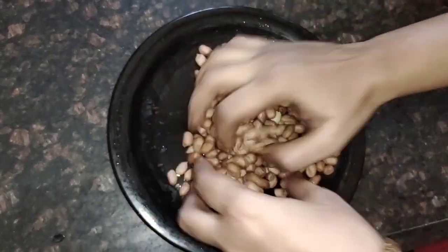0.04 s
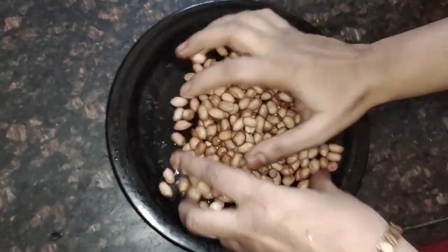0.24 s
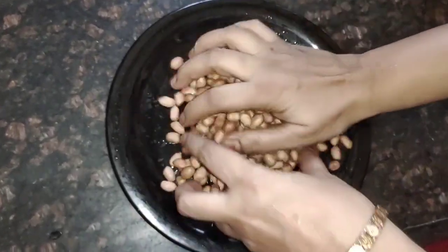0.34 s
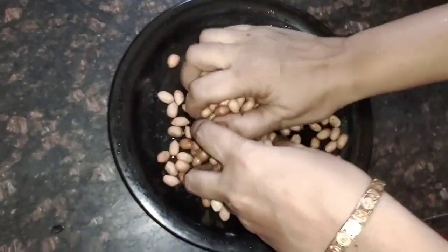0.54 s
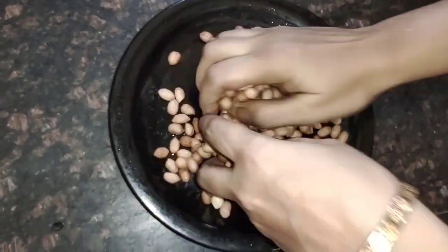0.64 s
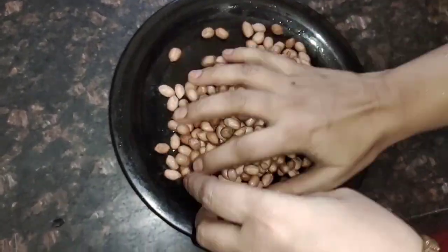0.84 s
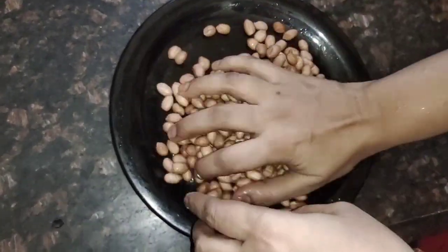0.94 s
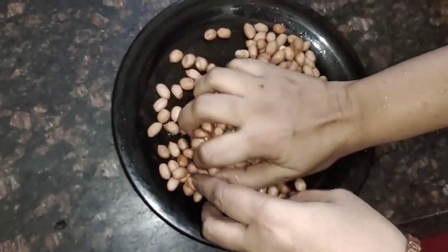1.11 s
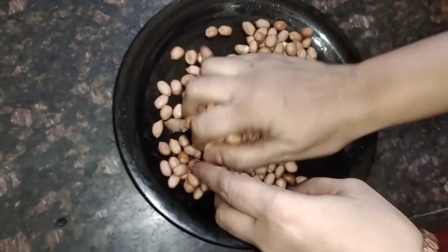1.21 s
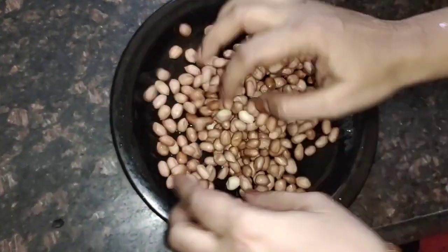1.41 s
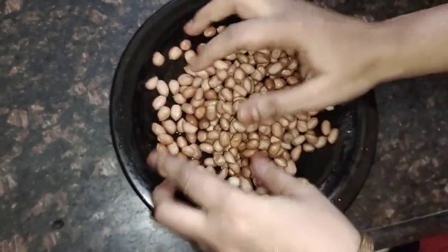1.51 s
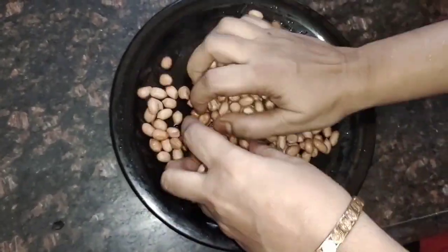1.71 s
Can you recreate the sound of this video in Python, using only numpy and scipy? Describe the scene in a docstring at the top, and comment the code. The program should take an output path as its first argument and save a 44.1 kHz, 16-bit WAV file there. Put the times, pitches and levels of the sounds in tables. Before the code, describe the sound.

Close up in a small hard kitchen, hands stir moist peanuts in a dish, starting softly, then clicking sharply in uneven bursts, with two gritty scrapes, fine hiss and slight dish ringing over very faint hum.

```python
"""Two hands turn damp raw peanuts in a shallow dish on a kitchen counter, over still air and a faint mains hum.
A few soft knocks come first; from 0.2 s a handful lands in sharp clicks, each a noise contact with short rings.
A strong scrape of stick-slip grains at 0.87 s leads into the loudest, densest knocks, up to about 1.1 s.
A tiny rising squeak, a swept sine, follows at 1.23 s; then come more knocks, with another scrape near 1.5 s.
Touches and a high hiss of ticks fill in, soft thuds sit below, the dish rings in its modes, a small room answers."""
import sys
import numpy as np
from scipy import signal
from scipy.fft import rfft, irfft
from scipy.io import wavfile
from scipy.ndimage import uniform_filter1d

SR = 44100
rng = np.random.default_rng(int(sys.argv[2]) if len(sys.argv) > 2 else 0)


def unload_audio(sound):
    """Save the sound as a 16-bit wav file, at the path given as the first command line argument."""
    columns = np.transpose(np.atleast_2d(sound))
    # keep every value between -1 and 1, then stretch to whole-number steps
    steps = np.round(np.clip(columns, -1, 1) * 32767)
    wavfile.write(sys.argv[1], SR, steps.astype(np.int16))


N = 77175

# Room air colour: f/Hz, relative level/dB
AIR_COLOUR = [(20, 0.5), (70, -4), (150, -3.5), (300, -3), (600, -4.5), (1500, -15.5), (3000, -30),
              (6000, -23), (10000, -30.5), (15500, -35)]
AIR_DB = -61
# Mains hum lines: f/Hz, rms level/dB
HUM_LINES = [(48.6, -64), (98, -70.5)]

# Small hard room: echo gain, decay below and in the treble, build-up time
ROOM_DB, ROOM_T60_S, ROOM_TREBLE_T60_S, ROOM_BUILD_UP_S = -8, 0.23, 0.38, 0.0017

# Modes of the dish: f/Hz, relative level/dB, t60/s
DISH_MODES = [(1020, -13, .12), (1735, -13, .14), (2010, -14, .14), (2415, -14, .14), (2630, -14, .12),
              (2732, -3, .26), (3672, -13, .14), (4361, -9, .1), (5110, -14, .05), (6226, -14, .06)]
DISH_DB = 2

# Fingers and nuts bumping the bottom of the dish: t/s, level/dB, f/Hz
BUMPS = [(.302, -39, 608), (0.321, -49, 370), (.795, -42.5, 724), (1.031, -45, 560), (1.07, -52, 254)]
BUMP_SWELL_S = 0.0036  # time to the peak, and time constant of the fade

# A damp nut squeaks on the bottom; the jitter is the rms share of the pitch
SQUEAK_AT_S, SQUEAK_S, SQUEAK_DB = 1.228, .045, -39
SQUEAK_START_HZ, SQUEAK_END_HZ, SQUEAK_JITTER = 560, 669, 0.094

# How hard the hands push nuts over the bottom: t/s, relative level/dB
PUSH = [(0, -64), (.06, -56), (.2, -71), (.224, -46), (.286, -53), (.316, -36), (.34, -50.5), (.62, -58.5),
        (.676, -54), (.73, -59), (.848, -42.5), (.872, -31.5), (.935, -39.5), (.99, -52.5), (1.222, -56),
        (1.242, -51.5), (1.36, -53.5), (1.472, -52), (1.496, -33), (1.534, -33.5), (1.546, -43),
        (1.6, -46.5), (1.66, -62.5), (1.75, -64)]
# Scraping colour: f/Hz, relative level/dB
SCRAPE_COLOUR = [(150, -57.5), (400, -22.5), (540, -2.5), (750, -1.5), (1030, 7), (1280, 0), (1450, 1),
                 (1750, 3), (2700, 0.5), (3300, -27), (4600, -35), (6300, -28), (8000, -43), (15000, -62)]
SCRAPE_DB, SLIPS_PER_S, SLIP_SPREAD_DB = 3, 2100, 9.5

# Colour of the high hiss: f/Hz, relative level/dB
HISS_COLOUR = [(1500, -39), (4000, 1), (6000, 3), (7200, 0.5), (9200, -7.5), (11000, -14.5), (15500, -40)]
HISS_DB, HISS_TICKS_PER_S, HISS_SPREAD_DB = -16, 1500, 9.5

# Small nuts jostling in the heap: t/s, relative level/dB
JOSTLE = [(0, -61.5), (.11, -65), (.21, -63), (.235, -42), (.29, -54), (.33, -41.5), (.48, -38.5),
          (.54, -58), (.62, -60), (.66, -38.5), (.82, -50.5), (.92, -36.5), (.96, -31.5), (1.06, -40.5),
          (1.16, -38.5), (1.22, -51), (1.28, -36.5), (1.36, -50.5), (1.45, -42.5), (1.58, -46), (1.66, -61),
          (1.75, -41)]
JOSTLE_DB = 0.5
# Sizes of nut in the heap: pitch f/Hz, relative level/dB
NUT_SIZES = [(1550, -6.5), (2050, 9), (2600, 5), (3200, 4), (3900, -11), (5600, 3.5)]
TOUCHES_PER_S, TOUCH_SPREAD_DB, TOUCH_WIDTH_HZ = 700, 4, 650

# Nuts landing and knocking: t/s, relative level/dB, knock pitch f/Hz,
# snap of the shell relative to the knock/dB (before SNAP_DB), decay time constant/s
KNOCKS = [(0.0385, -47, 2510, -8.5, 0.0038), (0.061, -42.5, 2310, -17, 0.0018),
          (0.0962, -45, 2730, -30, 0.003), (0.1136, -44, 2540, -32, 0.0027),
          (0.1388, -40.5, 3170, 4, 0.0054), (0.2186, -22.5, 2850, -9.5, 0.005),
          (0.227, -24, 2860, -11, 0.0028), (0.2578, -32, 2730, -9, 0.0034), (0.303, -35, 2260, -22, 0.0017),
          (0.3114, -21, 2750, 2.5, 0.001), (0.3154, -19, 2670, -12, 0.0033),
          (0.332, -25.5, 2880, 1, 0.0027), (0.343, -25.5, 2510, -3.5, 0.0022),
          (0.3702, -30, 3320, -9, 0.0025), (0.3838, -26, 3070, -4, 0.0012),
          (0.3983, -14.5, 4390, -2, 0.0022), (0.4064, -21.5, 2970, -25, 0.003),
          (0.4562, -24, 2590, -4.5, 0.0078), (0.4677, -30, 2760, -23, 0.0022),
          (0.4799, -27, 3030, 0, 0.0043), (0.4841, -26.5, 2690, -24, 0.0023),
          (0.504, -28, 2720, -22, 0.0024), (0.5688, -38.5, 2040, -24, 0.0057),
          (0.5765, -32.5, 1770, -19, 0.0027), (0.637, -31.5, 3050, -2.5, 0.0044),
          (0.6407, -32.5, 3100, 2, 0.0023), (0.6507, -25.5, 1647, -13, 0.0019),
          (0.6778, -27.5, 1897, -18, 0.0046), (0.6875, -26.5, 2770, -9.5, 0.0021),
          (0.727, -31.5, 2780, -10, 0.0022), (0.7453, -37, 2720, -21, 0.0025),
          (0.758, -29, 2550, -12.5, 0.0037), (0.7882, -27, 2150, -48, 0.0013),
          (0.7953, -28, 2470, -4, 0.0027), (0.8373, -34, 2340, -19, 0.002),
          (0.862, -22.5, 2320, -45, 0.0074), (0.872, -29, 1910, -23, 0.0041),
          (0.8841, -22.5, 2510, -9.5, 0.0044), (0.9026, -33, 2210, -24, 0.0014),
          (0.9254, -13, 2665, -14, 0.0076), (0.9375, -11, 2780, -1.5, 0.0026),
          (0.9556, -24, 2730, -15, 0.003), (0.9602, -17.5, 2730, -9, 0.0048),
          (0.9677, -22, 2710, -28, 0.003), (0.9812, -18, 2640, -9.5, 0.0016),
          (0.9876, -19, 2900, -5, 0.0015), (1.0011, -27.5, 2450, -26, 0.0042),
          (1.008, -26, 2860, -6, 0.0033), (1.0153, -21, 2750, -11.5, 0.005),
          (1.0302, -14.5, 2356, -14, 0.0014), (1.0329, -14.5, 2290, -23, 0.00083),
          (1.0552, -23, 2670, -11, 0.0008), (1.0698, -16, 2600, -18, 0.0014),
          (1.0984, -28.5, 2580, -29, 0.0014), (1.1184, -21, 2840, 1, 0.0016),
          (1.1567, -31.5, 2720, -3.5, 0.0017), (1.1836, -36.5, 2300, -6.5, 0.0049),
          (1.236, -30.5, 2390, -7, 0.0028), (1.2492, -28, 2220, -18, 0.002),
          (1.2542, -18.5, 2450, -16, 0.0018), (1.2775, -30, 2360, -11, 0.0056),
          (1.2823, -33, 2400, -31, 0.0028), (1.2924, -22.5, 2290, -30, 0.00086),
          (1.2992, -35, 2460, -4, 0.0026), (1.3299, -30.5, 2670, -23, 0.0019),
          (1.3532, -31.5, 1860, -28.5, 0.0016), (1.3728, -22, 2400, -16, 0.0013),
          (1.3774, -14, 2850, -5, 0.0028), (1.4158, -35, 2070, -23, 0.0023),
          (1.424, -38, 2510, -17, 0.0046), (1.4432, -16, 2750, -32, 0.0028),
          (1.473, -47, 2280, -25, 0.0016), (1.4777, -27, 2290, -18.5, 0.0023),
          (1.4856, -22, 2590, -36, 0.0017), (1.492, -22.5, 3000, -6, 0.005),
          (1.4965, -24.5, 2020, -13, 0.0045), (1.513, -18, 2590, -17, 0.00091),
          (1.524, -40, 1860, -10, 0.0024), (1.5308, -19.5, 2510, -13.5, 0.00063),
          (1.552, -28.5, 2810, -12, 0.0014), (1.5751, -28, 2590, -9, 0.0034),
          (1.5788, -26, 2270, -14, 0.0033), (1.5886, -25, 2670, -28, 0.0016),
          (1.5943, -29.5, 2670, -23, 0.0016), (1.6015, -35, 2380, -27, 0.003),
          (1.615, -36, 2630, -14, 0.003), (1.6329, -30, 2590, -6, 0.0028),
          (1.6724, -30.5, 2640, -13, 0.0035), (1.68, -26, 5730, -7, 0.0022),
          (1.7151, -24.5, 2690, -3, 0.00096), (1.7246, -34, 2670, -2, 0.0026)]
# Colour of a nut's contact: f/Hz, relative level/dB
NUT_COLOUR = [(100, -54), (420, -47), (600, -11.5), (1050, -16.5), (1250, -1), (1750, 1), (2350, -0.5),
              (2730, 3.5), (3050, -5), (3600, 0.5), (4350, -4.5), (4700, -14), (5100, -5.5), (5500, -10),
              (5800, -6), (6350, -9), (7000, -21.5), (9200, -28), (11000, -41), (15500, -49)]
KNOCK_DB, KNOCK_OCTAVES = -1.5, 0.46  # trim and bandwidth
CONTACT_S, CHATTER_DB, SOFT_ATTACK_S = 0.00017, -5, .0008  # the attack shortens as the snap brightens
RING_DB = -2.5  # ring at the nut's own pitch
# Side rings at chance pitches around the nut's own
SIDE_RINGS, SIDE_OCTAVES, SIDE_DECAY_S, SIDE_DB = 4, .6, .006, -7
# Snap: trim, lower edge, range of its chance ring and level of that ring
SNAP_DB, SNAP_HZ, SNAP_LOW_HZ, SNAP_HIGH_HZ, SNAP_RING_DB = -3.5, 4275, 4200, 6400, -2

TOP_HZ = 15800


def undb(db):
    """Decibels to gain."""
    return 10 ** (np.asarray(db) / 20)


def unit(x):
    """Scale to rms 1."""
    return x / np.sqrt(np.mean(x ** 2) + 1e-20)


def even(x, count=200):
    """Match layers by scaling the first samples to a standard deviation of 1."""
    return x / x[:count].std()


def curve(rows):
    """Gain over time, drawn straight in dB between (t/s, level/dB) points."""
    return undb(np.interp(np.arange(N) / SR, *np.array(rows).T))


def colour(x, points, order=4096):
    """Minimum-phase filter through (f/Hz, level/dB) points, by folding the cepstrum."""
    hz, db = np.array(points).T
    f = np.maximum(np.fft.rfftfreq(order, 1 / SR), 1)
    gain = undb(np.interp(np.log(f), np.log(hz), db))
    cepstrum = irfft(np.log(gain))
    cepstrum[1:order // 2] *= 2
    cepstrum[order // 2 + 1:] = 0
    impulse = irfft(np.exp(rfft(cepstrum)))
    return signal.fftconvolve(x, impulse)[:len(x)]


def band(x, hz, kind, order=2):
    """Butterworth filter."""
    edges = np.clip(hz, 20, SR / 2 - 500)
    return signal.sosfilt(signal.butter(order, edges, kind, fs=SR, output="sos"), x)


def resonance(x, hz, width_hz):
    """One short ring per impact, from a gentle bandpass."""
    return band(x, [hz - width_hz / 2, hz + width_hz / 2], "bandpass", order=1)


def grains(rate, spread_db):
    """Random tiny impacts of uneven size and sign, with an even mean level."""
    hit = rng.random(N) < rate / SR
    size = np.clip(rng.standard_normal(N), -2, 2)
    x = hit * np.sign(rng.standard_normal(N)) * undb(spread_db * size)
    power = np.abs(uniform_filter1d(x ** 2, size=1500))
    return x / np.sqrt(power + 1e-5)


def background():
    """Still room air is coloured noise; the hum is steady sines at chance phases."""
    t = np.arange(N) / SR
    hum = 0
    for hz, db in HUM_LINES:
        hum = hum + undb(db) * np.sqrt(2) * np.sin(2 * np.pi * (hz * t + rng.random()))
    air = undb(AIR_DB) * unit(colour(rng.standard_normal(N), AIR_COLOUR))
    return hum + air


def kitchen(x, size=22000):
    """A small hard room echoes as a diffuse noise tail, with its own decay in the treble."""
    t, noise = np.arange(size) / SR, rng.standard_normal(size)
    low = band(noise, 4500, "lowpass", order=1)
    low_fade = np.exp(-np.log(1000) * t / ROOM_T60_S)
    treble_fade = np.exp(-np.log(1000) * t / ROOM_TREBLE_T60_S)
    build_up = 1 - np.exp(-(t / ROOM_BUILD_UP_S) ** 2)
    tail = (low * low_fade + (noise - low) * treble_fade) * build_up
    return undb(ROOM_DB) * signal.fftconvolve(x, tail / np.linalg.norm(tail))[:N]


def dish(x, size=16000):
    """The dish rings in decaying modes, damped by the nuts and hands."""
    t = np.arange(size) / SR
    ring = 0
    for hz, db, t60 in DISH_MODES:
        decay = np.log(1000) / t60
        gain = undb(db + DISH_DB) * 2 * decay / SR  # a slow decay gets no extra gain at the mode
        ring = ring + gain * np.exp(-decay * t) * np.cos(2 * np.pi * hz * t)
    return signal.fftconvolve(x, ring)[:N]


def bumps():
    """Soft low thuds are sines that swell and die in a few cycles."""
    out = 0
    for s, db, hz in BUMPS:
        t = np.maximum(np.arange(N) / SR - s, 0)
        swell = np.e * t / BUMP_SWELL_S * np.exp(-t / BUMP_SWELL_S)  # peaks at 1
        out = out + undb(db) * swell * np.sin(2 * np.pi * hz * t)
    return out


def squeak():
    """A short, unsteady stick-slip is a wavering sine that rises in pitch."""
    progress = np.clip((np.arange(N) / SR - SQUEAK_AT_S) / SQUEAK_S, 0, 1)
    waver = 1 + SQUEAK_JITTER * unit(uniform_filter1d(rng.standard_normal(N), size=150))
    hz = (SQUEAK_START_HZ + (SQUEAK_END_HZ - SQUEAK_START_HZ) * progress) * waver
    return undb(SQUEAK_DB) * np.sin(np.pi * progress) * np.sin(2 * np.pi * np.cumsum(hz) / SR)


def scrape():
    """Nuts pressed to the bottom stick and slip in a dull, dense rattle."""
    rattle = unit(colour(grains(SLIPS_PER_S, SLIP_SPREAD_DB), SCRAPE_COLOUR))
    return rattle * curve(PUSH) * undb(SCRAPE_DB)


def hiss():
    """A fine, high hiss of tiny ticks follows the level of the jostling."""
    ticks = unit(colour(grains(HISS_TICKS_PER_S, HISS_SPREAD_DB), HISS_COLOUR))
    return ticks * curve(JOSTLE) * undb(HISS_DB)


def jostle():
    """Many soft touches inside the moving heap each ring at the pitch of one nut."""
    touches = grains(TOUCHES_PER_S, TOUCH_SPREAD_DB)
    which = rng.integers(len(NUT_SIZES), size=N)
    heap = 0
    for k, (hz, db) in enumerate(NUT_SIZES):
        heap = heap + undb(db) * resonance(touches * (which == k), hz, TOUCH_WIDTH_HZ)
    return unit(colour(heap, NUT_COLOUR)) * curve(JOSTLE) * undb(JOSTLE_DB)


def knocks(size=1400):
    """Each landing is a contact, brief chatter, short rings and a bright snap; dull ones start more softly."""
    out, t = np.zeros(N + size), np.arange(size) / SR
    half = 2 ** (KNOCK_OCTAVES / 2)
    noises = rng.standard_normal((len(KNOCKS), size))
    ratios = 2 ** (SIDE_OCTAVES * rng.uniform(-0.99, 1, (len(KNOCKS), SIDE_RINGS)))
    snap_pitches = rng.uniform(SNAP_LOW_HZ, SNAP_HIGH_HZ, len(KNOCKS))
    for (s, db, hz, snap_db, decay_s), noise, ratio, snap_hz in zip(KNOCKS, noises, ratios, snap_pitches):
        bright = undb(snap_db + SNAP_DB)
        fade = np.exp(-t / max(decay_s, .0004))
        attack = 1 - np.exp(-t * (1 + 10 * bright) / SOFT_ATTACK_S)
        edges = [hz / half, hz * half]

        strike = np.exp(-t / CONTACT_S) + undb(CHATTER_DB) * fade
        contact = colour(noise * attack * strike, NUT_COLOUR)
        body = band(contact, edges, "bandpass", order=1)
        body = band(body, max(SNAP_HZ, hz * half), "lowpass", order=3)
        ring = band(attack * fade * np.sin(2 * np.pi * hz * t), edges, "bandpass")
        side_tones = np.sin(2 * np.pi * hz * np.outer(ratio, t)).sum(axis=0)
        sides = colour(attack * np.exp(-t / SIDE_DECAY_S) * side_tones, NUT_COLOUR)
        knock = even(even(body) + undb(RING_DB) * even(ring) + undb(SIDE_DB) * even(sides))

        snap = even(band(contact, SNAP_HZ, "highpass", order=4))
        snap_ring = colour(attack * fade * np.sin(2 * np.pi * snap_hz * t), NUT_COLOUR)
        snap = even(snap + undb(SNAP_RING_DB) * even(snap_ring))

        mix = (knock + bright * snap) / np.hypot(1, bright)
        i = int(np.clip(s * SR, 0, N - 1))
        out[i:i + size] += undb(db + KNOCK_DB) * mix
    return out[:N]


def scene():
    """Nuts and hiss excite the dish; all of it sounds into the kitchen."""
    nuts = knocks() + jostle() + scrape() + bumps() + squeak()
    source = nuts + hiss()
    near = source + dish(source)
    return (near + kitchen(near) + background())[None]


def record(dry):
    """The recorder cuts the top with a steep elliptic lowpass."""
    return signal.sosfilt(signal.ellip(10, .2, 80, TOP_HZ, fs=SR, output="sos"), dry)


dry = scene()
out = record(dry)
unload_audio(out)
```